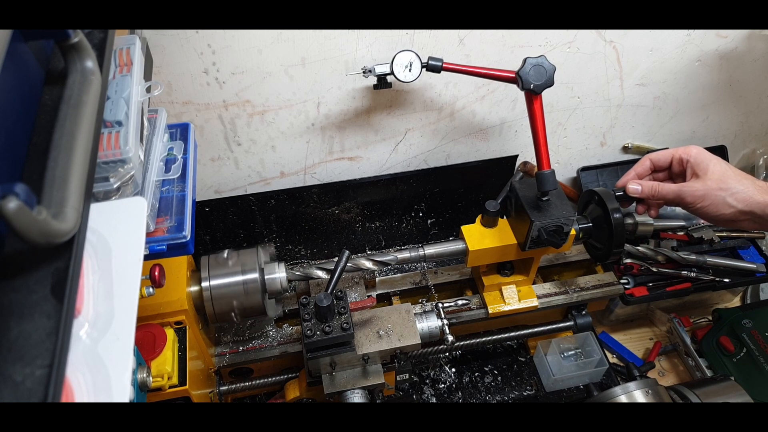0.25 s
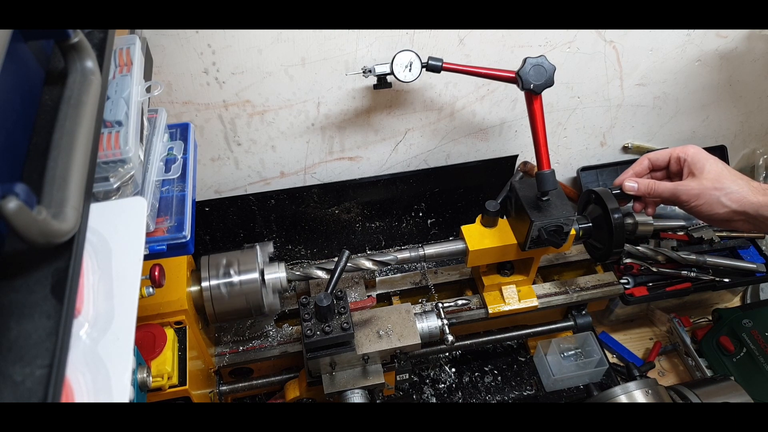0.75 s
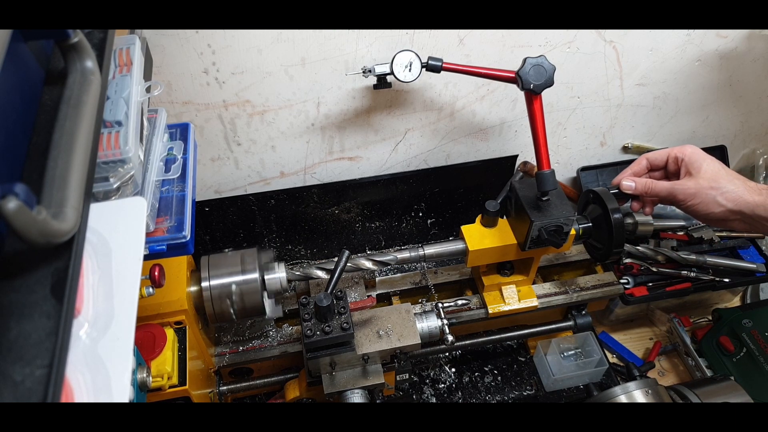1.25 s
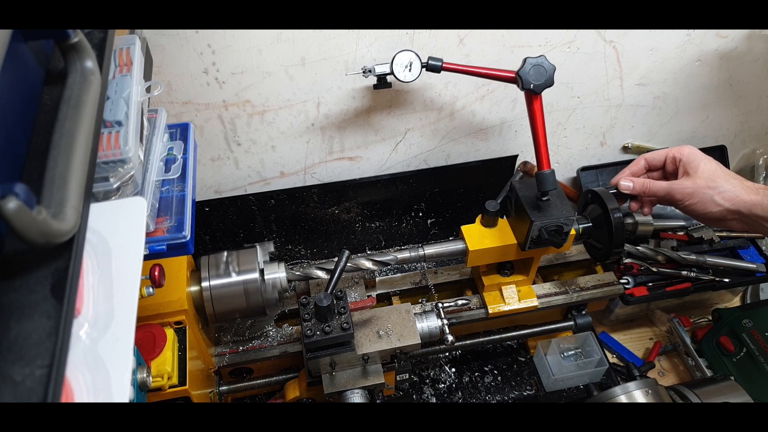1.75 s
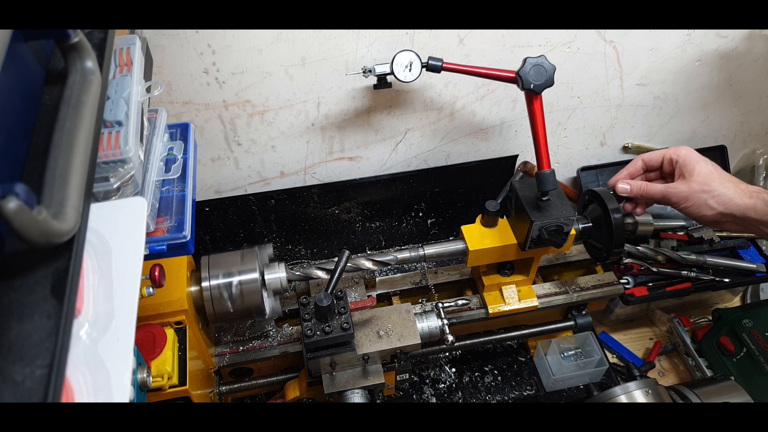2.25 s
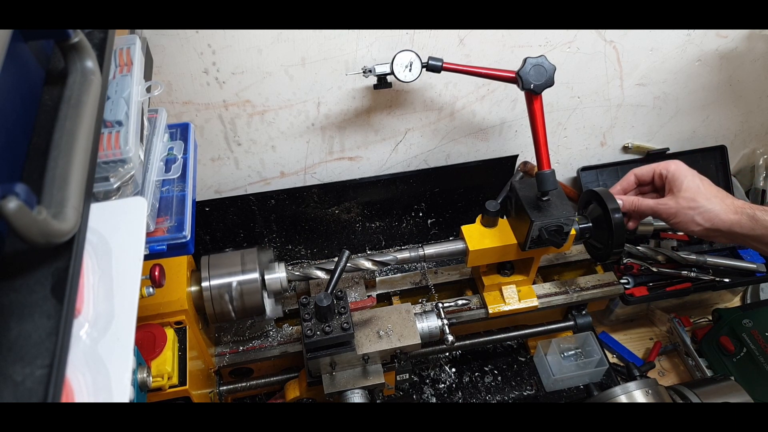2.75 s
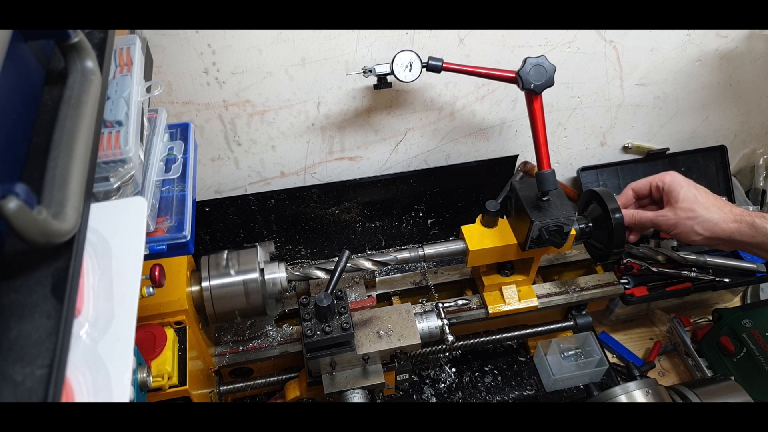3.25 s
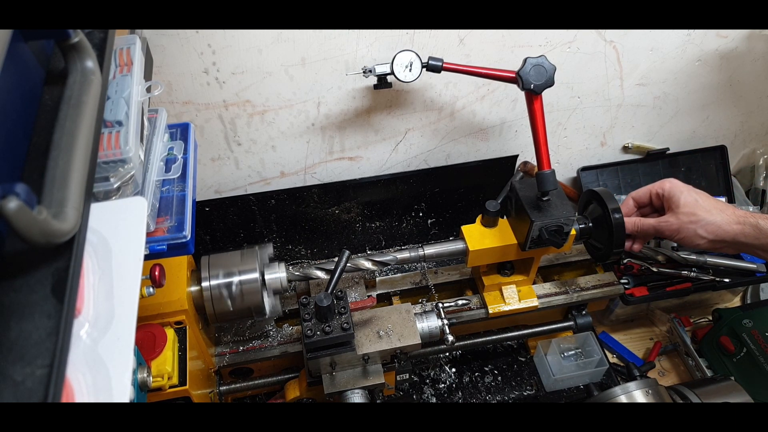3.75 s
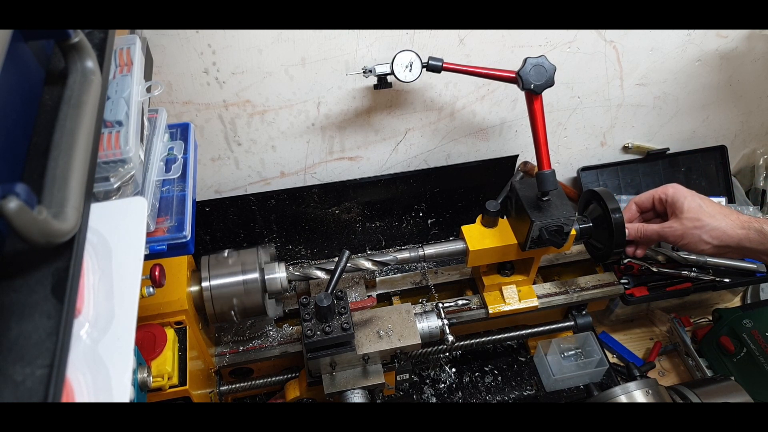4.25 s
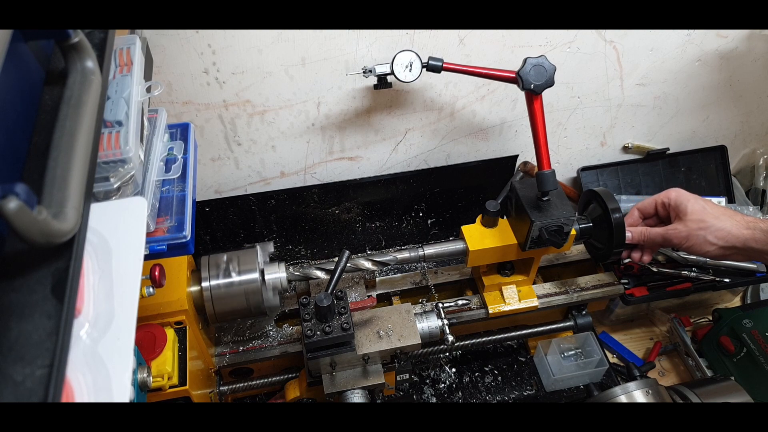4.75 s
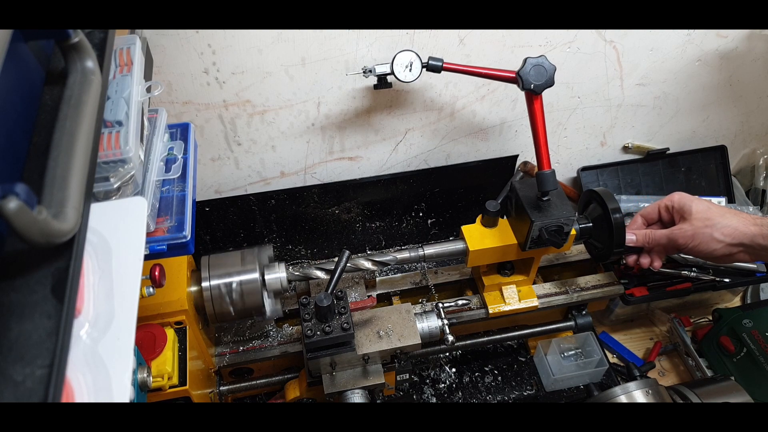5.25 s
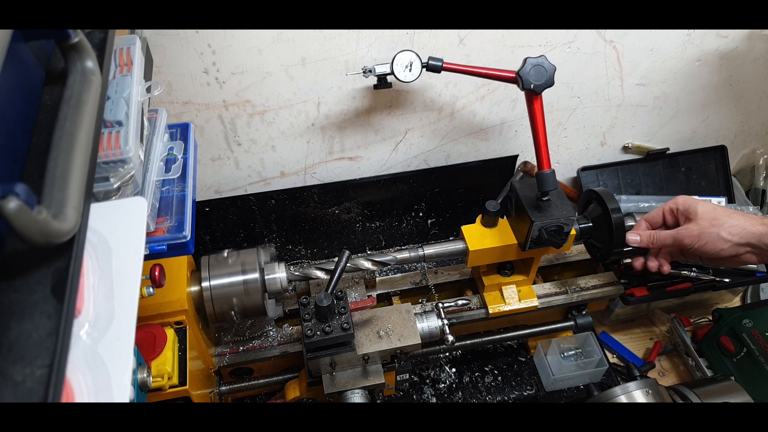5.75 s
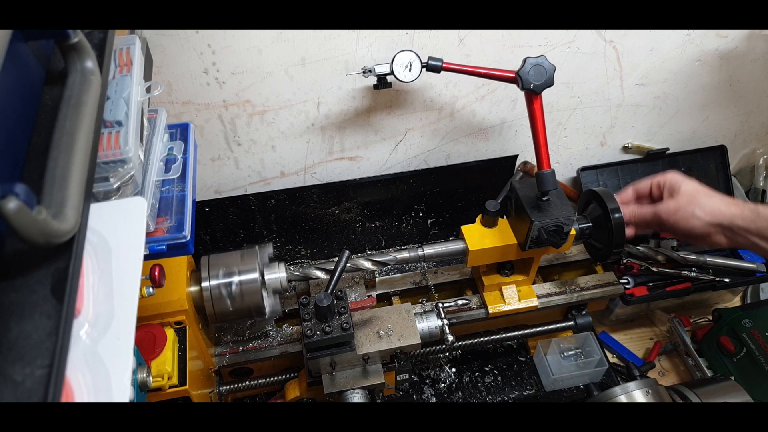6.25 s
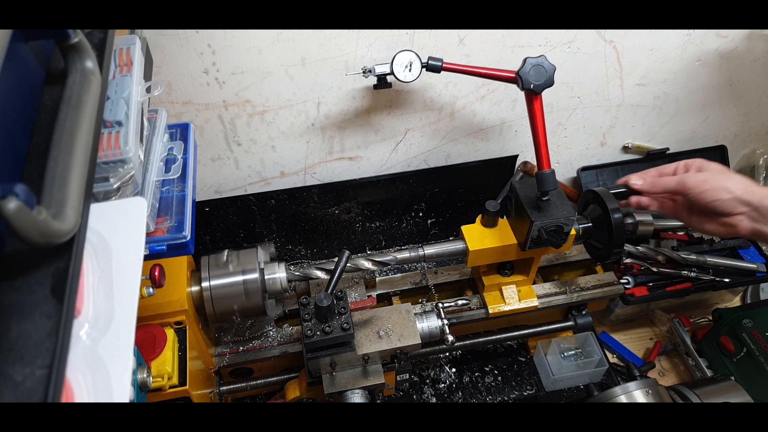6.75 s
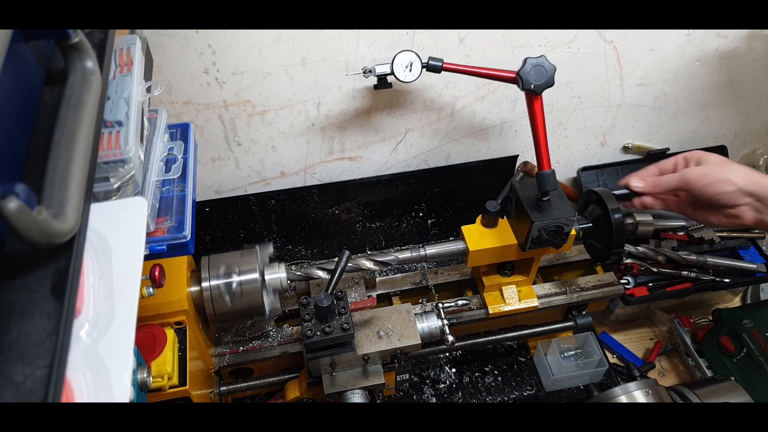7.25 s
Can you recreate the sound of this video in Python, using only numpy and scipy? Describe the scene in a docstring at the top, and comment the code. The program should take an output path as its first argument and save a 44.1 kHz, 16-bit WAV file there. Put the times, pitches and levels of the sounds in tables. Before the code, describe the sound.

A small metal lathe is already running, close by in a cramped workshop, with a steady motor hum, gear whine and bearing rush. From the start a drill bites into the spinning steel bar in a quick, uneven pulse, about eight bites a second, alternately stronger and weaker. Each bite is a short, gritty honk with a metallic scrape and fine crackle of chips. From about 2.5 to 3.3 seconds the drill catches in four short, sinking moans, with a hoarse groan and a thin, rasping squeal, while the gears labour. From about 3.5 seconds the rhythmic chatter returns, duller in its scrape but rising in pitch, and loudest between roughly 4.7 and 6.1 seconds. A last honk comes at about 6.3 seconds and the cutting stops. The motor and gears run on unloaded, quieter and slightly faster, until the end at about 7.5 seconds.

```python
"""Lathe drilling steel

A small lathe drills a spinning steel bar, close by in a cramped workshop. The drill's two lips bite in
turn, once each per revolution, the leading one mostly harder. At each bite the drill sticks and slips:
a short gritty honk that rises in pitch as the hole deepens. Then the drill is wound back and the gears
and motor run on unloaded."""
import sys
import numpy as np
from scipy import signal
from scipy.fft import rfft, irfft
from scipy.io import wavfile

SR = 44100
rng = np.random.default_rng(int(sys.argv[2]) if len(sys.argv) > 2 else 0)


def wrap_up_sound(samples):
    """Save the sound to the file named by the first command line argument, as 16-bit audio."""
    columns = np.atleast_2d(samples).T
    # keep every value between -1 and 1, then stretch to whole-number steps
    tamed = np.clip(columns, -1, 1)
    steps = np.round(tamed * 32767).astype(np.int16)
    wavfile.write(sys.argv[1], SR, steps)


N = 331191
TIME = np.arange(N) / SR
FREQS = np.fft.rfftfreq(N, 1 / SR)
SPINDLE_HZ, FIRST_BITE_S, LAST_BITE_S = 4.216, .215, 6.3
SAG = .036  # share of speed lost at full load

# Rubbing between bites. Each row: time in seconds, groan and grit levels in relative dB.
RUB_LEVELS = [(0.0, -31.5, -42.5), (2.12, -32.5, -49), (2.3, -24.5, -43), (2.88, -21.5, -37),
              (3.67, -25.5, -44.5), (6.19, -33.5, -42.5), (6.32, -27.5, -46), (6.5, -37, -79)]
# Groan of the rubbing drill. Each row: time in seconds, pitch in Hz, hoarseness 0-1.
GROAN_PITCH = [(0, 289.6, 0.02), (1.9, 295.7, 0.08), (2.7, 384.6, 0.85), (3.6, 361.9, 0.77),
               (4.4, 433, 0.97), (6.4, 463.4, 0.76)]
# Stick-slip unsteadiness, highest as the lips enter. Each row: time in seconds, roughness factor.
ROUGHNESS = [(2.0, .6), (2.6, 1.085), (3.9, 1.0), (4.4, 0.66)]
# Spindle wander about its steady speed. Each row: time in seconds, lag in seconds.
SPINDLE_LAG = [(.45, 0.0066), (1.15, -0.013), (1.85, -0.021), (2.57, -0.019), (3.26, -.033), (3.52, -0.021),
               (4.0, -0.016), (4.72, -.002), (5.19, -0.012), (5.9, -0.0029), (6.13, -0.018)]


def drill(jitter=.013, rub_db=-2):
    """One stick-slip cycle drives honk and scraping until the drill is wound back."""
    pitch_hz, chatter, bright, scrape = bites()
    rough, = follow(ROUGHNESS)
    cycles = np.cumsum(pitch_hz * (1 + jitter * rough * drift(130))) / SR
    rubbing = gain_of(follow(RUB_LEVELS)[1] + rub_db) * np.clip((6.42 - TIME) / 0.096, 0, 1)
    return (honk(pitch_hz, cycles, rough, chatter, bright) + scraping(cycles, rough, scrape, rubbing)
            + drill_body(scrape, rubbing) + crunch(scrape))


def lips():
    """Two bites a turn, leading lip first; rows as for extra_strokes in bites()."""
    # Hand feed on the leading lip. Each row: time in seconds, chatter and scrape in relative dB.
    feed = [(.22, -24.5, -34), (1.15, -26.5, -35), (1.62, -23.5, -32.5), (2.1, -22, -30),
            (2.33, -21, -39.5), (2.57, -39, -40), (3.26, -40, -40), (3.52, -22.5, -44), (4.02, -28.5, -43),
            (4.23, -19, -43.5), (4.72, -14.5, -35.5), (4.95, -19, -39), (5.19, -17.5, -37),
            (5.45, -15.5, -39.5), (5.9, -17.5, -40), (6.12, -17.5, -42), (6.28, -23, -46)]
    # The drill stiffens with depth. Each row: time in seconds, grip and release pitch in Hz,
    # bite length in seconds.
    depth = [(1.15, 289.1, 330, 0.072), (1.62, 298.9, 395, .073), (2.1, 303.3, 410, 0.071),
             (2.35, 375.6, 410, 0.083), (3.05, 409, 350, .11), (3.52, 372.9, 385, 0.092),
             (4.23, 404.9, 456, 0.069), (4.72, 439, 455, 0.071), (5.19, 459.5, 482, 0.076),
             (5.45, 450.6, 495, 0.073), (6.12, 476.9, 520, 0.076)]
    # Second lip against the first. Each row: time in seconds, delay in turns, added chatter and scrape
    # in dB, length ratio, share of the upward glide.
    second_lip = [(.3, 0.45, -5, -11.5, 1.12, 0.41), (1.3, 0.46, -5.5, -5, 0.85, 0.31),
                  (1.97, 0.48, -8, -5, 0.84, 0.42), (2.22, 0.45, -3.5, -1, 1.026, 0.84),
                  (2.45, 0.53, 2, -13.5, 1.12, 1), (3.2, 0.63, 0, -9.5, 1, 0.93),
                  (3.65, 0.52, -3.5, -1.5, 0.97, 0.97), (4.25, .565, -9.5, -5.5, 1, 1),
                  (4.61, 0.55, -2, -2, .85, 0.95), (5.07, 0.55, -5, -7, 1.244, 0.99),
                  (5.85, 0.58, 1, 4, .95, 1)]
    rows = []
    for steady_s in np.arange(FIRST_BITE_S, LAST_BITE_S, 1 / SPINDLE_HZ):
        s = steady_s + at(SPINDLE_LAG, steady_s)[0]
        grip_hz, release_hz, length_s = at(depth, s)
        rows.append((s, length_s, grip_hz, release_hz, *at(feed, s)))
        s += at(second_lip, s)[0] / SPINDLE_HZ
        _, chatter_add_db, scrape_add_db, stretch, glide = at(second_lip, s)
        grip_hz, release_hz, length_s = at(depth, s)
        chatter_db, scrape_db = at(feed, s)
        release_hz = grip_hz + glide * (release_hz - grip_hz)
        rows.append((s, length_s * stretch, 1.03 * grip_hz, 1.03 * release_hz,  # sings a little higher
                     chatter_db + chatter_add_db, scrape_db + scrape_add_db))
    return rows


def bites(glide_from_s=-.01, glide_s=.036):
    """Bites grip fast and let go slowly. Returns pitch in Hz; chatter, overtone and scrape envelopes."""
    # The opening bite, brighter rasps on the last bites, a closing honk. Each row: time and length
    # in seconds, grip and release pitch in Hz, chatter and scrape in relative dB.
    extra_strokes = [(0.079, 0.044, 294.6, 302.4, -26.5, -35.5), (6.061, 0.03, 513, 516.5, -43, -35.5),
                     (6.13, 0.092, 499.7, 520.6, -51, -35.5), (6.327, 0.061, 434.4, 412.3, -21.5, -45)]
    # The first scrapes swell gently; later ones start sharply.
    # Each row: time in seconds, rising share of the scrape.
    scrape_rise = [(.7, 0.33), (1.9, 0.13), (2.2, 0.16), (2.6, 0.16)]
    chatter, bright, scrape, weight, pitch_sum = np.zeros((5, N))
    for s, length_s, grip_hz, release_hz, chatter_db, scrape_db in lips() + extra_strokes:
        near = slice(max(0, int((s - length_s) * SR)), int((s + length_s) * SR))
        t = TIME[near] - s
        hang_s = .075 * max(release_hz / grip_hz - 1, 0)  # a wider upward glide hangs on longer
        late_s = t - hang_s / 2
        swing = swell(late_s, length_s + hang_s, rise=0.28) ** 0.75
        chatter[near] += gain_of(chatter_db) * swing
        bright[near] += gain_of(scrape_db) * swing
        scrape[near] += gain_of(scrape_db) * swell(t, 1.34 * length_s, at(scrape_rise, s)[0]) ** 1.62
        glide = np.clip((late_s - glide_from_s) / glide_s, 0, 1)
        share = np.exp(-(2 * t / length_s) ** 2)
        pitch_sum[near] += share * (grip_hz + (release_hz - grip_hz) * glide)
        weight[near] += share
    pitch_hz = (pitch_sum + 1e-9 * follow(GROAN_PITCH)[0]) / (weight + 1e-9)  # groan pitch between bites
    return pitch_hz, chatter, bright, scrape


def honk(pitch_hz, cycles, rough, chatter, bright, chatter_db=-1, limit=0.91, rolloff_db=-6):
    """The drill swings until friction limits it; harder scraping strengthens the overtones."""
    # Overtone radiation. Each row: frequency in Hz, gain in dB.
    radiation = [(600, -1), (720, -5), (900, 0), (1080, -14), (1450, 1.5), (1750, -3.5), (2600, 8.5)]
    flutter_db = 4 * np.minimum(rough, 1) ** 2 * drift(95)
    swing = limit * np.tanh(np.sqrt(2) * chatter * gain_of(chatter_db + flutter_db) / limit)
    partials = [np.sqrt(2) * bright * gain_of(rolloff_db * (k - 2)) * np.sin(2 * np.pi * k * cycles)
                for k in range(2, 7)]
    overtones = sum(p * gain_of(read(radiation, k * pitch_hz)) for k, p in enumerate(partials, 2))
    overtones /= np.sqrt(rough)  # a steadier cycle keeps more energy in them
    bar = gain_of(13) * mode(partials[0], hz=1036, width_hz=20)  # the octave meets it in the last bites
    fundamental = swing * np.sin(2 * np.pi * cycles)
    return workshop(fundamental + bar, wet_db=-23.5) + workshop(overtones, wet_db=-6.5)


def scraping(cycles, rough, scrape, rubbing, slips_db=-12, force_db=9, puff_cycles=0.14):
    """A sharp slip each cycle tears off grit; the sound dulls as the lips sink into the hole."""
    # Lips in the hole. Each row: time in seconds, buried share 0-1.
    burial = [(2.15, 0.27), (2.6, 0.84)]
    buried, = follow(burial)
    harmonics = sum(np.cos(2 * np.pi * k * cycles) for k in range(5, 16))
    slips = unit_rms(harmonics * gain_of(4.6 * drift(160))) / rough
    puffs = 0.12 + np.exp(-(cycles % 1) / puff_cycles)
    sound = np.zeros((2, N))
    for _ in range(2):  # the drill's point and corner
        grit = unit_rms(grains(spread_db=3) * puffs)
        force = gain_of(force_db) * (scrape * (gain_of(slips_db) * slips + grit) + rubbing * grit)
        ringing = steel(force * (1 - buried), column=1) + steel(force * buried, column=2)
        sound += workshop(ringing, wet_db=12)
    return sound / np.sqrt(2)


def steel(force, column, size=8192):
    """The lathe's steel colours a force, as a minimum-phase filter."""
    # Scrape colour. Each row: frequency in Hz, gain in dB at the hole's mouth, gain in dB when buried.
    colour = [(279.8, -30, -20), (424, 1.5, 17), (576, 8.5, 10.5), (930, 7, 2), (940, -4, 0.5),
              (1226, -5, 4), (1830, -6.5, -7), (2450, 3, -1), (3400, 1, -7), (3680, -6, -10.5),
              (5100, -4.5, -9), (6730, -9.5, -16.5), (7730, -17, -29), (10500, -12, -18),
              (15600, -29.5, -29)]
    # Modes of chuck, bar and tailstock. Each row: frequency and width in Hz, dB above the colour.
    modes = [(907, 14, 6.5), (1415.4, 14, 10.5), (1831, 38, 12.5)]
    hz = abs(np.fft.fftfreq(size, 1 / SR))
    peaks = sum((gain_of(db) - 1) / (1 + (2 * (hz - mode_hz) / width_hz) ** 2)
                for mode_hz, width_hz, db in modes)
    gain = gain_of(read(np.array(colour)[:, [0, column]], hz)) * (1 + peaks)
    spectrum = np.exp(np.conj(signal.hilbert(np.log(gain))))
    response = np.fft.ifft(spectrum).real[:size // 2]
    return signal.oaconvolve(force, response)[:N]


def drill_body(scrape, rubbing, sunk_db=-12, fizz_db=-19):
    """Grit rings the tip, less inside the hole; the rubbed shank sings; swarf fizzes in the flutes."""
    # Tip modes. Each row: frequency and width in Hz, level in relative dB.
    tip_modes = [(2563, 95, -1.5), (2717, 48, -1.5), (2987, 30, -14.5), (4815, 34, -13), (5510, 38, -13.5)]
    sunk, = follow([(2.2, 0.0073), (3.4, 1)])
    force = unit_rms(grains(spread_db=6)) * (scrape + 0.14 * rubbing) * gain_of(sunk_db * sunk)
    tip = sum(mode(force, hz, width_hz) * gain_of(db) * np.sqrt(SR / np.pi / width_hz)
              for hz, width_hz, db in tip_modes)
    shank = narrow(3015, width_hz=24) * gain_of(-14.5) + narrow(4740, width_hz=60) * gain_of(-21)
    fizz = unit_band(rng.standard_normal(N), 9500, 14000) * gain_of(fizz_db)
    return workshop(tip + rubbing * (shank + fizz), wet_db=-1.5)


def crunch(scrape, cracks_per_s=700, spread_db=3.5):
    """Chips break, chiefly in the hardest bites: sharp cracks with a bright spit on top."""
    sizes = gain_of(spread_db * np.minimum(rng.exponential(1, N), 3)) * rng.choice([-1., 1.], N)
    impulses = sizes * (rng.random(N) < cracks_per_s / SR)
    crack = unit_band(impulses, 3000, 4200) * gain_of(-12)
    spit = unit_band(impulses, 9200, 13800) * gain_of(-10)
    return workshop((crack + spit) * scrape ** 2 / scrape.max(), wet_db=7)


def moans(sink_s=0.0392, rise_s=0.0085, flutter_db=2, jitter=0.015):
    """The drill catches as the full lips enter; each moan sinks and fades as the lip works free."""
    # Each row: start and length in seconds, first and target pitch in Hz, level in dB.
    catches = [(2.503, 0.12, 451.5, 292, -18), (2.764, 0.13, 401, 364.3, -13),
               (2.996, 0.13, 432, 338, -14.5), (3.227, 0.093, 444.5, 339.4, -12.5)]
    sound = np.zeros(N)
    waver, flutter = 1 + jitter * drift(83), gain_of(flutter_db * drift(53))
    for s, length_s, start_hz, end_hz, db in catches:
        near = slice(int(s * SR), int((s + length_s) * SR))
        t = TIME[near] - TIME[near][0]
        hz = (end_hz + (start_hz - end_hz) * np.exp(-t / sink_s)) * waver[near]
        envelope = np.minimum(t / rise_s, 1) * (1 - t / length_s) ** 0.76
        sound[near] += gain_of(db) * envelope * np.sin(2 * np.pi * np.cumsum(hz) / SR)
    return workshop(sound * flutter, wet_db=-29)


def squeals(tip_hz=2585, stutter_db=3.5):
    """As the full lips enter, the tip's main mode rings thinly in a broad, stuttering rasp."""
    # Each row: time and length in seconds, level in dB.
    bursts = [(2.606, 0.21, -39.5), (2.804, 0.18, -30), (3.037, 0.15, -34.5)]
    envelope = sum(gain_of(db) * swell(TIME - s, length_s, rise=.9) for s, length_s, db in bursts)
    rasp = narrow(tip_hz, width_hz=60) + gain_of(-1) * narrow(tip_hz, width_hz=1100)
    return workshop(envelope * unit_rms(rasp * gain_of(stutter_db * drift(90))), wet_db=0)


def groan(groan_db=-6, growl_db=-8, growl_swing_db=5):
    """Friction shakes the drill's bending mode and the bed; the second lip growls once a turn."""
    # Bed shudder, peaking as the full lips enter. Each row: time in seconds, level in dB.
    shudder = [(0, -49), (2.3, -55), (2.62, -38), (2.85, -43.5), (3.7, -55), (5.9, -56.5), (6.4, -79)]
    in_hole = np.clip((6.5 - TIME) / 0.17, 0, 1)
    drag = np.cos(2 * np.pi * (revolutions() - 0.5))
    growl = narrow(690, width_hz=170) * gain_of(growl_db + growl_swing_db * drag) * follow(ROUGHNESS)[0]
    hz, hoarse = follow(GROAN_PITCH)
    flex = np.sqrt(1 - hoarse) * narrow(hz, width_hz=43) + np.sqrt(hoarse) * narrow(hz, width_hz=103)
    bend = (flex + growl) * gain_of(follow(RUB_LEVELS)[0] + groan_db) * in_hole
    bed = narrow(145, width_hz=100) * gain_of(follow(shudder)[0])
    return workshop(bend + bed, wet_db=-21)


def drive(mains_hum_hz=100, waver=0.0078, jolt=0.02015, stutter_db=3):
    """Motor, gears and casing: load makes them louder, and slows and jolts the gears."""
    # Each row: time in seconds, spindle load (1 = full cut).
    spindle_load = [(0, 0.66), (2.2, 0.84), (2.9, 1.0), (4.1, 0.8), (5.95, .9), (6.15, 0.4), (6.5, 0.029)]
    # Motor hum. Each row, one per harmonic: unloaded level in dB, dB added by full load.
    hum_levels = [(-59, 8.5), (-62, 8)]
    # Belt and gear tones. Each row: unloaded pitch and width in Hz, unloaded dB, dB added by full load.
    gears = [(56, 7.8, -64.5, 8), (126.3, 7.6, -59, 12), (446.6, 25.79, -59.5, 28.5),
             (703.6, 35.86, -46, 9), (806, 98, -71, 25), (914, 37, -60, 7.5), (1398, 31.8, -64.5, 5)]
    # Headstock casing modes, independent of speed. Columns as for gears.
    casing_modes = [(387.7, 14.26, -44.5, 7.5), (413.4, 24, -48, 2)]
    load, = follow(spindle_load)
    speed = 1 - load * (SAG + jolt * drift(30.24))
    hum = sum(np.sqrt(2) * np.sin(2 * np.pi * (k * mains_hum_hz * TIME + rng.random()))
              * gain_of(db + load_db * load) for k, (db, load_db) in enumerate(hum_levels, 1))
    tones = np.array([mesh(hz * speed, width_hz) * gain_of(db + load_db * load)
                      for hz, width_hz, db, load_db in gears])
    casing = sum(mesh(hz * (1 + waver * drift(19)), width_hz) * gain_of(db + load_db * load)
                 for hz, width_hz, db, load_db in casing_modes)
    throb = np.cos(2 * np.pi * 2 * (revolutions() - 0.2))  # twice a turn
    low = np.array(gears)[:, 0] < 500
    drone = (tones[low].sum(0) + casing) * (1 + 0.14 * throb)
    whine = tones[~low].sum(0) * (1 + 0.17 * throb) * gain_of(stutter_db * load * drift(33))
    return hum + workshop(drone, wet_db=-30) + workshop(whine, wet_db=-19)


def mesh(hz, width_hz, even_mix_hz=16):
    """Tooth-meshing tone: the narrower it is, the more of it is a clean line."""
    line = np.sqrt(2) * np.sin(2 * np.pi * np.cumsum(hz + width_hz / 4 * drift(10.45)) / SR)
    return unit_rms(even_mix_hz / width_hz * line + narrow(hz, width_hz))


def revolutions():
    """Spindle turns, whole at each leading bite; faster once unloaded."""
    gained_s = SAG * np.maximum(TIME - LAST_BITE_S, 0)
    return SPINDLE_HZ * (TIME - FIRST_BITE_S - follow(SPINDLE_LAG)[0] + gained_s)


def bearings(treble_db=-51.73, rattle_db=1.3):
    """Wide rush of bearings and spinning chuck, with a fine rattle."""
    # Idle spectrum. Each row: frequency in Hz, density in relative dB.
    idle = [(90, -36.5), (250, -13.5), (480, -25), (640, -13), (900, -20), (1050, -27.5), (1800, -27.5),
            (3400, -34), (5200, -39), (8000, -54), (9800, -45.5), (13000, -44), (15500, -50)]
    # Each row: frequency in Hz, left-right coherence 0-1.
    coherence = [(400, 0.95), (600, 0.1), (1200, 0)]
    left, other = rfft(rng.standard_normal((2, N)) * gain_of(rattle_db * drift(110)))
    same = read(coherence, FREQS)
    right = same * left + np.sqrt(1 - same ** 2) * other
    rush = irfft(np.array([left, right]) * gain_of(read(idle, FREQS)), N)
    treble = irfft(rfft(rush) * ((FREQS > 1000) & (FREQS < 15000)), N)
    return gain_of(treble_db) * rush / np.sqrt(np.mean(treble ** 2))


def workshop(x, wet_db, count=900):
    """Direct sound plus dense reflections from wall, bench and chip tray, different on each side."""
    # Room decay. Each row: frequency in Hz, T60 in seconds.
    decay = [(450, 0.25), (3000, 0.061), (15000, 0.041)]
    delays = 40 + 20 * np.arange(count) + rng.integers(0, 20, (2, count))
    taps = np.zeros((2, SR // 2))
    np.put_along_axis(taps, delays, rng.choice([-1., 1.], delays.shape), 1)
    hz, t, spectra = signal.stft(taps, SR, nperseg=256)
    tail = signal.istft(spectra * gain_of(-60 * t / read(decay, hz)[:, None]), SR, nperseg=256)[1]
    echoes = signal.fftconvolve(x[None], tail / np.linalg.norm(tail[0]), axes=1)[:, :N]
    return (x + gain_of(wet_db) * echoes) / np.sqrt(1 + gain_of(wet_db) ** 2)


def narrow(hz, width_hz):
    """Wavering tone of a resonance shaken at random, rms 1."""
    phase = 2 * np.pi * np.cumsum(hz * np.ones(N)) / SR
    return unit_rms(drift(width_hz / 2) * np.cos(phase) + drift(width_hz / 2) * np.sin(phase))


def mode(x, hz, width_hz):
    """One resonance, gain 1 at its centre."""
    return signal.lfilter(*signal.iirpeak(hz, hz / width_hz, SR), x)


def grains(spread_db):
    """Spiky white noise."""
    return rng.standard_normal(N) * gain_of(spread_db * np.minimum(rng.exponential(1, N), 6))


def drift(hz):
    """Random wander up to the given rate, rms 1."""
    return unit_rms(irfft(rfft(rng.standard_normal(N)) / (1 + (FREQS / hz) ** 4), N))


def swell(t, length_s, rise):
    """Smooth hump around t = 0, rising for the given share of its length."""
    progress = t / length_s + (1 + 2 * rise) / 4
    return np.sin(np.pi * np.interp(progress, [0, rise, 1], [0, .5, 1])) ** 2


def unit_band(x, low_hz, high_hz):
    """Band-pass, scaled to rms 1."""
    return unit_rms(signal.sosfilt(signal.butter(2, [low_hz, high_hz], "band", fs=SR, output="sos"), x))


def unit_rms(x):
    """Scales to rms 1."""
    return x / np.sqrt(np.mean(x ** 2) + 1e-20)


def gain_of(db):
    """Decibels to amplitude."""
    return 10 ** (np.asarray(db) / 20)


def at(rows, s):
    """Columns of a time table at the given seconds."""
    times, *columns = np.transpose(rows)
    return [np.interp(s, times, column) for column in columns]


def follow(rows):
    """Columns of a time table at every sample."""
    return at(rows, TIME)


def read(rows, hz):
    """Interpolates a spectrum table over log frequency."""
    row_hz, values = np.transpose(rows)
    return np.interp(np.log(hz + 1), np.log(row_hz + 1), values)


def scene():
    """The lathe in stereo, heard through standing waves between it and the wall."""
    # Each row: frequency in Hz, left minus right in dB.
    balance = [(60, 1), (130, 4), (240, 0), (350, 2.5), (440, -1.5), (505, 15), (550, -1), (615, 0),
               (700, 3.5), (1200, -2), (4000, 0), (8000, 2.5)]
    # Each row: frequency in Hz, lag of the right side in radians.
    right_lag = [(495, 0), (555, 4), (650, 6), (750, 7), (800, 8.5), (900, 6.5)]
    lathe = drill() + moans() + squeals() + groan() + drive() + bearings()
    sides = gain_of(read(balance, FREQS) * np.array([[.5], [-.5]]))
    lag = np.exp(-1j * read(right_lag, FREQS) * np.array([[0], [1]]))
    return irfft(rfft(lathe) * lag * sides / sides.mean(0), N)


def record(dry, low_hz=42, high_hz=15750):
    """The microphone drops the deepest bass; a steep low-pass limits the treble."""
    thin = signal.sosfilt(signal.butter(2, low_hz, "high", fs=SR, output="sos"), dry)
    low_pass = signal.firwin(511, high_hz, window=("kaiser", 9), fs=SR)
    return signal.oaconvolve(thin, low_pass[None], "same")


dry = scene()
out = record(dry)
wrap_up_sound(out)
```